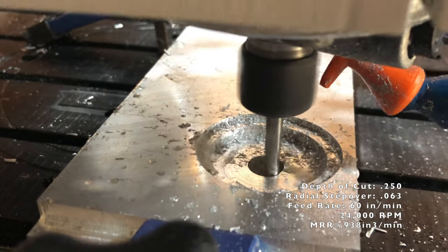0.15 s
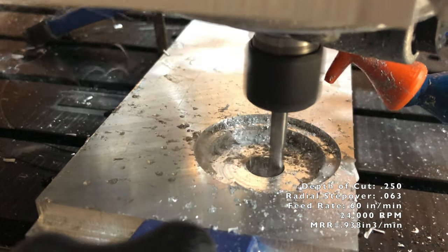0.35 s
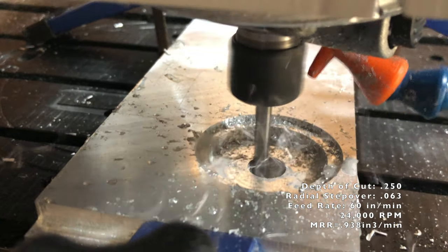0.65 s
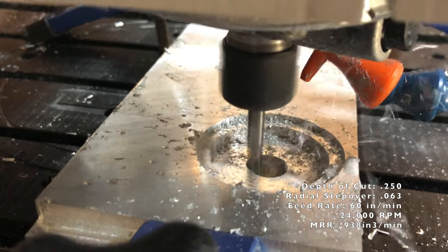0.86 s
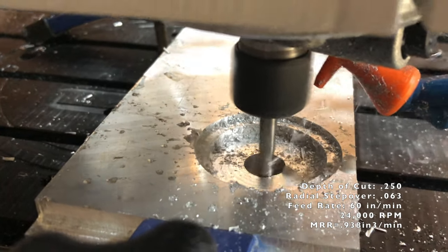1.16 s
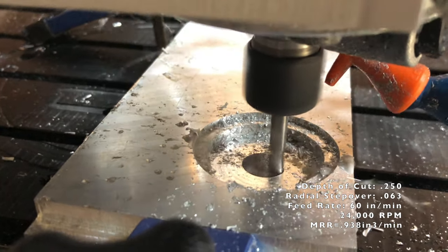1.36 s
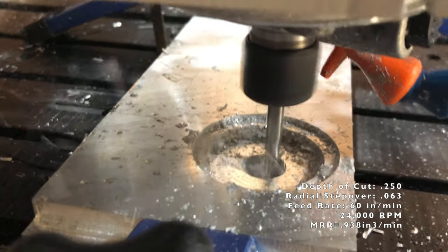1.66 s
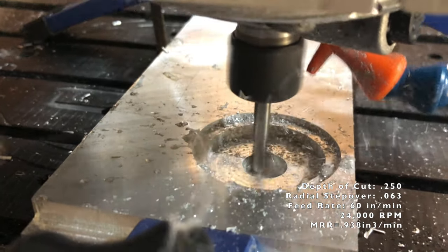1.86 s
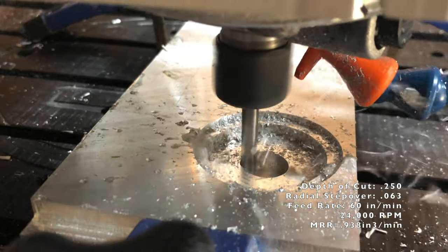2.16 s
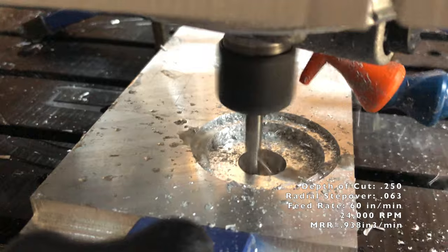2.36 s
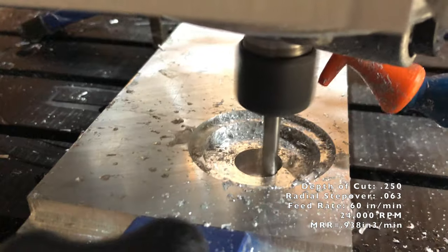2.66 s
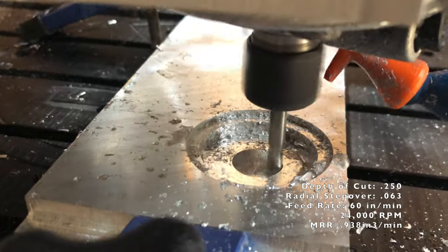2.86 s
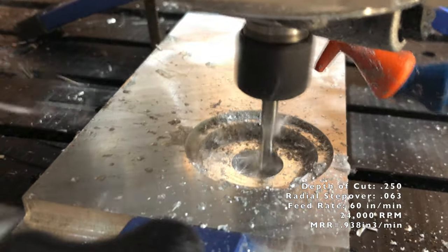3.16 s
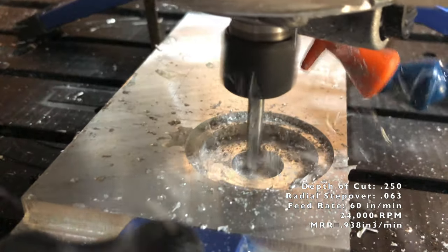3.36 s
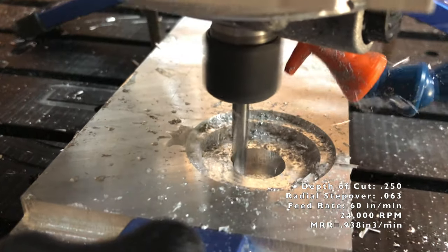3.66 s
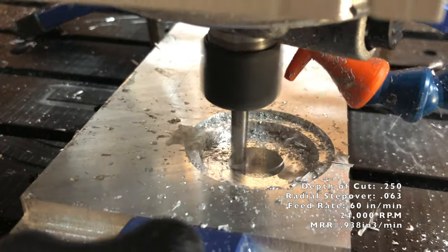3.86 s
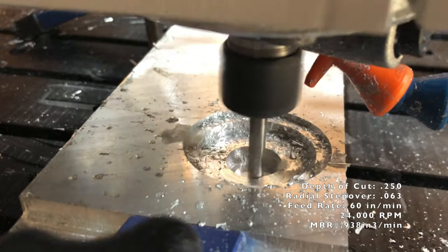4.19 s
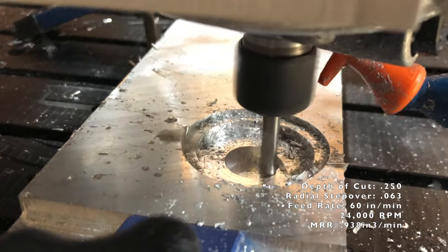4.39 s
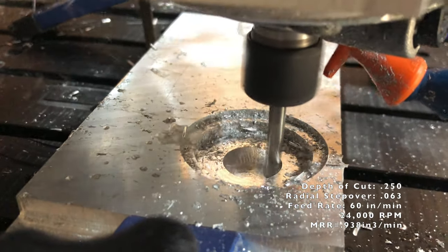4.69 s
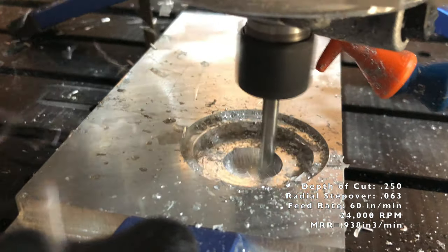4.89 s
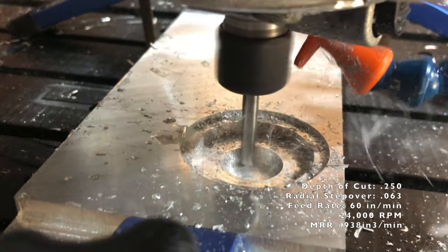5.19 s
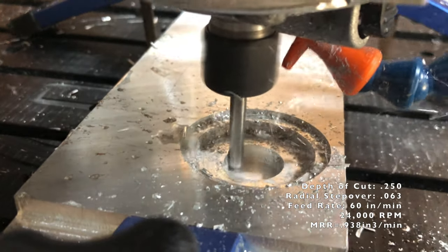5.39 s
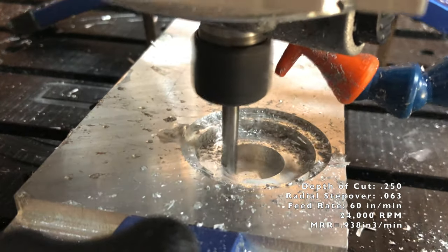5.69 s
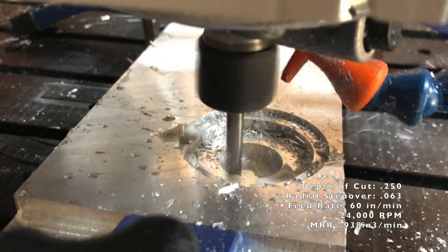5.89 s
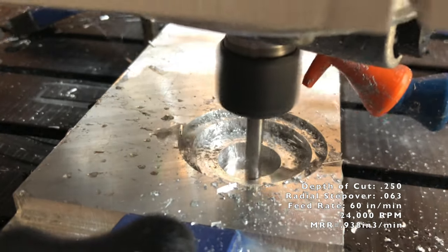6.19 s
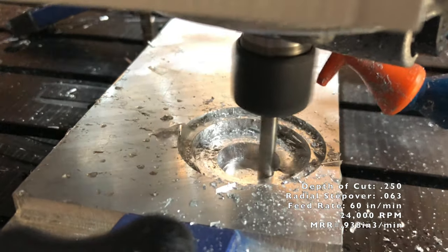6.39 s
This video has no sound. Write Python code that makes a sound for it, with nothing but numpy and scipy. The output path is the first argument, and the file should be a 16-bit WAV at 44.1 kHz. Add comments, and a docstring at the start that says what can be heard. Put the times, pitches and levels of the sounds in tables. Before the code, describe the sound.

A spinning end mill cuts a round pocket in aluminium, already running at the start and never stopping. A mid-pitched spindle whine sags and recovers each lap while a loud, shrill, buzzy chatter squeals above it, abruptly dropping slightly in pitch and catching again. Chips and an air jet hiss throughout; a faint low drone comes and goes. Close single microphone, dry, the same on both sides.

```python
"""A ringing spindle, a harsh high chatter and a hiss start together: an end mill circles in an aluminium pocket.
The spindle slows under load, and each turn rings as a stack of sines at whole multiples (orders) of its turn rate.
The tool chatters at two high tones, which the turning cutter chops into side lines; takeovers swap their strength.
Torn chips and the air jet hiss as coloured noise; in some feed directions the table drones as a low wavering sine.
A single microphone stands close by, so both channels carry the same sound."""
import sys
import numpy as np
from scipy import signal
from scipy.fft import rfft, irfft, next_fast_len
from scipy.io import wavfile

SR = 44100
rng = np.random.default_rng(int(sys.argv[2]) if len(sys.argv) > 2 else 0)


def bounce(signal):
    """Save signal as a 16-bit WAV file at the path given by the first command-line argument."""
    frames = np.transpose(np.atleast_2d(signal))
    limited = np.clip(frames, -1, 1)
    pcm = np.round(limited * 32767).astype(np.int16)
    wavfile.write(sys.argv[1], SR, pcm)


N = 288395
T = np.arange(N) / SR  # seconds
PADDED = next_fast_len(N)
BINS = np.maximum(np.arange(PADDED // 2 + 1) * SR / PADDED, 1)  # Hz


def undb(db):
    """Turn decibels into an amplitude factor."""
    return np.exp(np.asarray(db) * np.log(10) / 20)


def turns(hz):
    """Phase in radians of a moving frequency."""
    return 2 * np.pi * np.cumsum(hz) / SR


def walk(rate):
    """Random values joined by straight lines, rate a second; spread near 1."""
    knots = rng.standard_normal(int(N / SR * rate) + 2)
    return 1.22 * np.interp(T * rate, np.arange(len(knots)), knots)


# The tool spirals outwards, so laps grow longer. One row each quarter lap, from one quarter before a lap.
# Columns: start_s, and what is added to the lap patterns: turn_rate_hz, main_tone_hz, second_chatter_db,
# drone_db, order_1_db, hiss_db
QUARTER_LAPS = [(-0.28, 1.06, 18.5, -6, -3.0, 9, -7), (0.16, 2.5, 14.0, -9, -8, -4, -1.5),
                (0.34, 3.0, 28.0, 12, -2, -2.5, -1.5), (0.61, -0.8, -3.5, 3, 3, 1.5, -2),
                (0.9, 0.85, -5.0, 4.5, 6.0, 3.5, 0.0), (1.2, -2.0, -18.5, 4, -5.0, 1, -0.5),
                (1.46, -0.5, -4.0, 7.5, 3, -1.5, 0.0), (1.83, -0.9, -5.0, 4, -1, 1.5, -2.5),
                (2.16, -0.43, -6.0, 3.5, 1, 2, 0.0), (2.57, -1, -4.0, 2, 1.0, -1.5, 0.0),
                (2.88, -0.5, -6.0, 4.5, 2, -1.5, -1), (3.36, -0.05, 1.5, 7, 1.5, 0.5, -1),
                (3.73, 1.0, 1.5, 0, 3.0, 0.0, -0.5), (4.23, 0.87, 3.5, 9, 6, 1.5, 1),
                (4.59, -0.9, -9.5, 6.5, 5, -1.5, -1), (5.18, 2.5, 17.5, 1, -2, -2.5, -1),
                (5.6, 0.5, -10.5, 4.5, -1.0, 1, 0.0), (6.17, -0.6, 5.0, 2.0, 1, 0.0, 0.5),
                (6.71, 0.2, -1.5, 7, 7.0, -2, -4)]
DRIFT_COLUMNS = ["start_s", "turn_rate_hz", "main_tone_hz", "second_chatter_db", "drone_db", "order_1_db", "hiss_db"]
QUARTER_START_S = np.array(QUARTER_LAPS)[:, 0]
QUARTERS_GONE = np.interp(T, QUARTER_START_S, np.arange(len(QUARTER_LAPS))) - 1


def drift(name):
    """How far one setting moves from its lap pattern, one value a sample."""
    column = np.array(QUARTER_LAPS)[:, DRIFT_COLUMNS.index(name)]
    return np.interp(T, QUARTER_START_S, column)


def read(table):
    """Columns of a lap pattern, one value a sample, repeated as the tool goes round."""
    place, *columns = np.transpose(table)
    return [np.interp(QUARTERS_GONE, place, column, period=4) for column in columns]


def swelling(table):
    """Line levels that rise and fall twice a lap with the feed direction."""
    return [(order, mean_db + swell_db * np.cos(np.pi * (QUARTERS_GONE - loudest)))
            for order, mean_db, swell_db, loudest in table]


SWEEP = 1.1  # radians per order squared: higher lines come later in each turn, so a cut is an upward chirp


def lines(tone, shaft, table, waver_db, rate, slip):
    """Sines at a tone plus whole spindle orders; each wavers in level and slips in phase as the cut moves on."""
    out = 0
    for order, db in table:
        level = np.sqrt(2) * undb(db + waver_db * walk(rate))  # without waver, db is the rms level
        phase = tone + order * shaft - SWEEP * order ** 2 / 2 + slip * walk(rate)
        out = out + level * np.cos(phase)
    return out


def strong(tone, shaft, orders, levels_db, waver_db, rate, slip):
    """Lines that each follow their own moving level."""
    return sum(undb(db) * lines(tone, shaft, [(order, 0)], waver_db, rate, slip)
               for order, db in zip(orders, levels_db))


def noise(gain):
    """Noise with one gain for each frequency bin."""
    return irfft(rfft(rng.standard_normal(PADDED)) * gain, PADDED)[:N]


def band(hz, width):
    """Noise around one centre, rms 1."""
    out = noise(1 / (1 + ((BINS - hz) / width) ** 2))
    return out / out.std()


# What the spindle does round each lap, before drift.
# Columns: place_quarter_laps, turn_rate_hz, order_1_db, order_2_db, order_3_db, order_5_db
SPINDLE_LAP = [(0.0, 364.2, -53, -48.5, -65, -55), (0.29, 360.6, -52, -46.5, -56, -54.5),
               (0.54, 353.8, -56.5, -57, -58.5, -54.5), (0.79, 347, -57.0, -53.5, -55.5, -55),
               (1.12, 346.5, -52, -59, -57.5, -58), (1.29, 351.3, -50, -55, -54.5, -59),
               (1.62, 353.7, -49.5, -51, -57, -58.5), (1.88, 364.5, -58, -57.0, -56.0, -58.5),
               (2.12, 363.4, -69.5, -57.5, -55, -56.5), (2.38, 356.4, -64.5, -53.5, -60.0, -55),
               (2.62, 351.1, -65, -83.5, -57.5, -50), (2.79, 345.8, -56.5, -69, -59, -51),
               (2.88, 344, -56, -56.5, -62.5, -51.0), (3.29, 349.4, -51.5, -56.5, -53.5, -58.5),
               (3.46, 352.3, -50.5, -54.5, -52.5, -56), (3.71, 358.4, -52.5, -53.0, -68, -66)]
# Weaker spindle orders, swelling twice a lap.
# Columns: order_number, mean_db, swell_db, loudest_quarter_laps
WEAK_ORDERS = [(4, -63.5, 1.5, 0.75), (6, -65.5, 5.5, 0.49), (7, -69, 7, -0.01), (8, -68.5, 4, 0.84),
               (9, -71, 5, 0), (10, -69, 5.5, -0.1)]


def spindle_shaft():
    """Shaft angle in radians: the turn rate sags under load round each lap."""
    return turns(read(SPINDLE_LAP)[0] + drift("turn_rate_hz"))


def spindle(shaft):
    """Unbalance and tooth blows repeat with the shaft, so they ring at whole orders of the turn rate."""
    levels_db = read(SPINDLE_LAP)[1:]
    levels_db[0] = levels_db[0] + drift("order_1_db")
    main_orders = strong(0, shaft, (1, 2, 3, 5), levels_db, waver_db=1.73, rate=25, slip=0.22)
    weak_orders = lines(0, shaft, swelling(WEAK_ORDERS), waver_db=2.2, rate=9, slip=.3)
    return main_orders + weak_orders


# The second chatter takes over for a moment, mostly lower in pitch; then the main one catches again at once,
# often a little sharp.
# Columns: start_s, end_s, main_gain_db, second_gain_db, second_drop_hz, main_jump_hz
TAKEOVER_MOMENTS = [(0.494, 0.576, 1.5, 0, 9, 1), (0.799, 0.999, -10.5, 8, 49.5, 25),
                    (1.343, 1.547, -11, 9, 45.5, 14.5), (1.638, 1.702, -1.5, 5, 21, 0),
                    (2.1, 2.233, -12, 8, 55, 30.5), (2.37, 2.44, -5, 12, 45, 10.5),
                    (2.794, 2.96, -7.5, 6.5, 50.5, 5.5), (3.15, 3.233, -4.5, 2.5, 24.5, 3.5),
                    (3.667, 3.777, -8, 8.5, 55.5, 11), (3.854, 3.926, -2.5, 7.5, 44, 0.5),
                    (3.94, 4.153, -2, 7, -1, -0.5), (4.483, 4.616, -7, 5, 37.5, 15),
                    (4.896, 4.991, -1, 2, 11.5, 0), (5.5, 5.631, -22, 5, 70, 19),
                    (5.685, 5.748, -7, 5, 45.5, 4), (5.85, 5.93, -3.5, 7, 33, 6.5)]
SWITCH_S, SETTLE_S = 0.01434, .12
SINK_SHARE = 0.39  # share of a takeover in which the main chatter sinks


def takeovers():
    """Main gain dB, second gain dB, second drop Hz and main jump Hz of all takeovers, one value a sample."""
    out = np.zeros((4, N))
    for start, end, main_db, second_db, drop_hz, jump_hz in TAKEOVER_MOMENTS:
        on = np.interp(T, [start - SWITCH_S, start + SWITCH_S, end - SWITCH_S, end], [0, 1, 1, 0])
        sunk = start + SINK_SHARE * (end - start)
        sink = np.interp(T, [start, sunk, end - SWITCH_S, end], [0, 1, 1, 0])
        after = np.interp(T, [end - SWITCH_S, end, end + SETTLE_S], [0, 1, 0])
        out += [main_db * sink, second_db * on, drop_hz * on, jump_hz * after]
    return out


# Chips and air round each lap, before drift and small trims; the treble level also guides bright chatter lines.
# Columns: place_quarter_laps, treble_db, middle_db
HISS_LAP = [(0, -51.5, -50.5), (.2, -52, -49.5), (.8, -52, -47.5), (1.4, -56.5, -50), (1.7, -54, -48),
            (2.1, -51.5, -49.5), (2.7, -54.5, -46), (3.2, -57, -49), (3.7, -55.5, -50)]
# Main chatter round each lap, before drift and takeovers; the lines sit whole spindle orders from the tone.
# Columns: place_quarter_laps, tone_hz, line_minus_2_db, line_minus_1_db, line_0_db, line_1_db, line_2_db
MAIN_CHATTER_LAP = [(0.0, 4637.5, -59, -58, -42.5, -56, -54.5), (0.21, 4627, -48.5, -54, -47.5, -52, -47),
                    (0.38, 4570, -46, -66.0, -51.0, -64, -51.5), (0.71, 4485, -52, -54.5, -50, -77, -53),
                    (0.96, 4441, -49, -42, -55, -48, -57), (1.29, 4499, -43, -63.5, -53.5, -49.5, -63),
                    (1.54, 4524, -43.0, -48.5, -52, -52, -48.5),
                    (1.79, 4621, -51, -46.5, -43.5, -58.5, -49), (2.04, 4647, -47, -48.5, -44.5, -59, -51),
                    (2.21, 4608, -50, -51.5, -47.5, -84, -44.5), (2.54, 4506, -56, -47.5, -57, -67, -51),
                    (2.88, 4433, -49.5, -52.5, -46, -84, -56.5), (2.96, 4418, -59.5, -48, -55, -70, -59),
                    (3.12, 4466, -47.5, -50, -43, -57, -57), (3.46, 4540, -44.5, -52, -49, -47, -60.5),
                    (3.62, 4595, -48.5, -46.0, -42, -59, -52), (3.79, 4618, -50.0, -47, -45, -50, -52.5)]
# Fainter lines of the main chatter, level against all its strong lines together.
# Columns: orders_from_tone, mean_db, swell_db, loudest_quarter_laps
FAINT_CHATTER_LINES = [(-10, -48, 13, 0.36), (-9, -28.5, 0.5, 0.88), (-8, -24.5, 2, 0.45),
                       (-7, -26.5, 5.5, 0.54), (-6, -32, 0, .9), (-5, -27, 5, .7), (-4, -19, 6.5, 0.62),
                       (-3, -21, -1.5, 0.19)]
# Spindle orders near the tone that it lifts, level against all strong lines together.
# Columns: order_number, level_db
ORDERS_NEAR_TONE = [(11, -26), (12, -23), (13, -22), (14, -24), (15, -24), (16, -30)]
# The tool leaves the cut once a swing, which doubles the tone; level against the treble hiss in HISS_LAP,
# before fading with the swing.
# Columns: orders_from_twice_the_tone, level_db
DOUBLED_TONE_LINES = [(-9, -5.5), (-8, -11), (-7, -7.5), (-6, -10), (-5, -8.5), (-4, -12), (-3, -8),
                      (-2, -4.5), (-1, -27), (0, -14), (1, -10.5), (2, -26), (3, -24), (4, -13)]
# Lines that brighten with the treble hiss in HISS_LAP; level against it, before fading with the swing.
# Columns: orders_from_tone, level_db
BRIGHT_CHATTER_LINES = [(3, -11.5), (4, -9), (5, -16), (6, -24), (7, -15), (8, -20), (9, -6), (10, -31),
                        (11, -14.5)]
# Second chatter round each lap, before drift and takeovers.
# Columns: place_quarter_laps, level_db
SECOND_CHATTER_LAP = [(0, -63), (.54, -60), (.96, -59.5), (1.29, -61.5), (1.62, -56.5), (1.79, -57),
                      (2.04, -64), (2.29, -54), (2.7, -56), (3.04, -55), (3.54, -60.5)]
# Lines of the second chatter, level against SECOND_CHATTER_LAP.
# Columns: orders_from_tone, level_db
SECOND_CHATTER_LINES = [(-3, -24), (-2, -16), (-1, -13), (0, -7), (1, -2), (2, -7), (3, -12), (4, -12),
                        (5, -16), (6, -19)]
# Mixing product of both swings, level against their (geometric) mean level.
# Columns: orders_from_it, level_db
MIXED_CHATTER_LINES = [(-2, -21), (-1, -12), (0, -38), (1, -29), (2, -27)]
GAP_HZ = 82.5  # the second tone lies this far below the main one, before takeovers and wander


def chatter(shaft):
    """Two self-excited tool swings, slightly unsteady in phase, each chopped by the turning flutes."""
    main_db, second_db, drop_hz, jump_hz = takeovers()
    hz, *levels_db = read(MAIN_CHATTER_LAP)
    hz = hz + drift("main_tone_hz")
    levels_db = levels_db + main_db
    tone = turns(hz + jump_hz) + .2 * walk(90)
    swing = np.sqrt(sum(undb(db) ** 2 for db in levels_db))  # all strong lines together
    bright = undb(read(HISS_LAP)[0]) * np.tanh(swing / undb(-45.5))  # gone when the swing dies
    doubled = bright * np.tanh(swing / undb(-43.5))

    # the strong lines play 0.84 dB above their table
    out = undb(0.84) * strong(tone, shaft, range(-2, 3), levels_db, waver_db=1.57, rate=30, slip=0.3)
    out += swing * lines(tone, shaft, swelling(FAINT_CHATTER_LINES), waver_db=2, rate=12, slip=.4)
    out += swing * lines(0, shaft, ORDERS_NEAR_TONE, waver_db=7.0, rate=8.8, slip=0.94)
    out += doubled * lines(2 * tone, shaft, DOUBLED_TONE_LINES, waver_db=1.5, rate=14, slip=1.0)
    out += bright * lines(tone, shaft, BRIGHT_CHATTER_LINES, waver_db=4.5, rate=12, slip=0.97)

    second_level = undb(read(SECOND_CHATTER_LAP)[0] + drift("second_chatter_db") + second_db)
    second = turns(hz - GAP_HZ - drop_hz + 9 * walk(7)) + 0.3 * walk(70)
    out += second_level * lines(second, shaft, SECOND_CHATTER_LINES, waver_db=2.5, rate=18, slip=0.4)

    # the two swings mix: a comb as far above the main tone as the second lies below it
    mixed = lines(2 * tone - second, shaft, MIXED_CHATTER_LINES, waver_db=3, rate=16, slip=0.6)
    return out + np.sqrt(swing * second_level) * mixed


# Tone colour of the hiss before the middle and treble get their own levels.
# Columns: pitch_hz, relative_level_db
HISS_SHAPE = [(30, -32), (200, -21), (480, -14), (1200, -12), (2300, -16.5), (3050, -11), (3450, -12.5),
              (4600, -3), (5550, -8), (6050, -5.5), (7100, -10), (8100, -7), (11000, -12), (15700, -18)]
SPLIT_HZ = 6300  # slices centred here or above count as treble


def hiss(shaft):
    """Chips and air: noise in slices that each swell alone; the treble puffs once a turn and flutters."""
    shape_hz, shape_db = np.transpose(HISS_SHAPE)
    colour = undb(np.interp(np.log(BINS), np.log(shape_hz), shape_db))
    centres = np.geomspace(300, 14500, num=12)  # Hz
    place = np.interp(np.log(BINS), np.log(centres), np.arange(len(centres)))
    middle, treble = np.zeros(N), np.zeros(N)
    for k, hz in enumerate(centres):
        window = np.cos(np.pi / 2 * np.clip(place - k, -1, 1))  # fades out at the neighbouring centres
        part = noise(colour * window) * undb(1.3 * walk(8.3) + 0.7 * walk(35))
        if hz < SPLIT_HZ:
            middle += part
        else:
            treble += part
    treble_db, middle_db = read(HISS_LAP) + drift("hiss_db")
    flutter_db = 0.18 * walk(40) + 0.65 * walk(150)
    puff = (1 + 0.36 * np.cos(shaft)) * undb(treble_db + 4.0 + flutter_db)
    return puff * treble / treble.std() + undb(middle_db - 1.0) * middle / middle.std()


# Table drone round each lap, before drift.
# Columns: place_quarter_laps, level_db
DRONE_LAP = [(0.0, -81.0), (0.29, -83), (1.04, -82), (1.21, -89), (1.54, -81), (1.62, -77.5), (2.38, -67),
             (2.88, -71.5), (3.21, -87)]
DRONE_HZ = 63.7  # centre of a slightly wandering pitch


def drone():
    """The table hums in some feed directions; a thin high hiss rises with the hum."""
    db = read(DRONE_LAP)[0] + drift("drone_db")
    level = np.sqrt(2) * undb(db + 3.0 * walk(6.27) + 1.2 * walk(8.7))
    hum = level * np.sin(turns(DRONE_HZ + 0.67 * walk(3.905)))
    thin_hiss = undb(-33.0 + 0.38 * db + 2.5 * walk(60)) * band(hz=13700, width=1400)
    return hum + thin_hiss


def scene():
    """One turning shaft drives the spindle, chatter and hiss; the table drone joins them."""
    shaft = spindle_shaft()
    bite = undb(.6 * walk(36))  # chips pack and clear, so chatter and hiss flutter together
    mono = spindle(shaft) + bite * (chatter(shaft) + hiss(shaft)) + drone()
    return np.array([mono, mono])


TOP_HZ = 15620  # above this the sound is cut steeply


def record(dry):
    """One microphone on both channels; peaks are rounded and the top is cut steeply."""
    soft = np.tanh(12 * dry) / 12
    top_cut = signal.ellip(12, .2, 80, TOP_HZ, fs=SR, output="sos")  # 0.2 dB ripple, 80 dB down
    return signal.sosfilt(top_cut, soft)


dry = scene()
out = record(dry)
bounce(out)
```